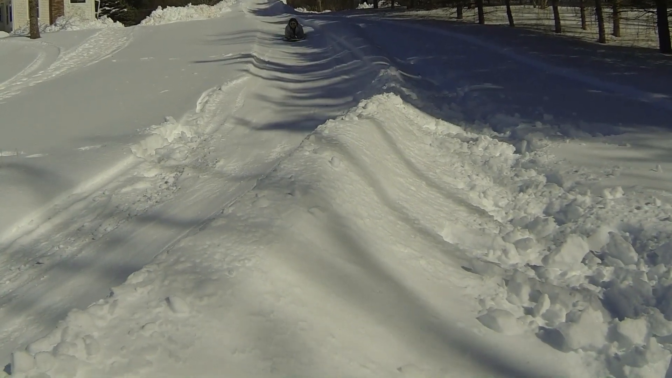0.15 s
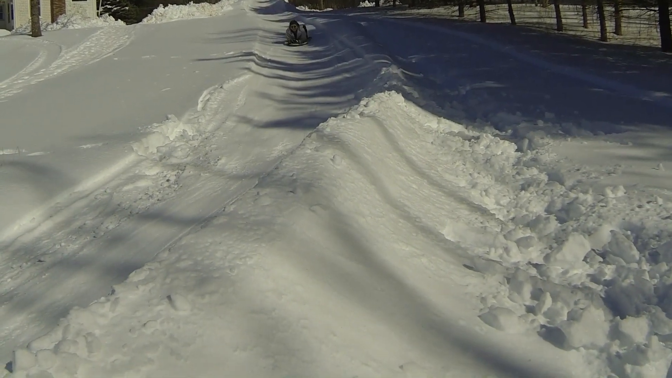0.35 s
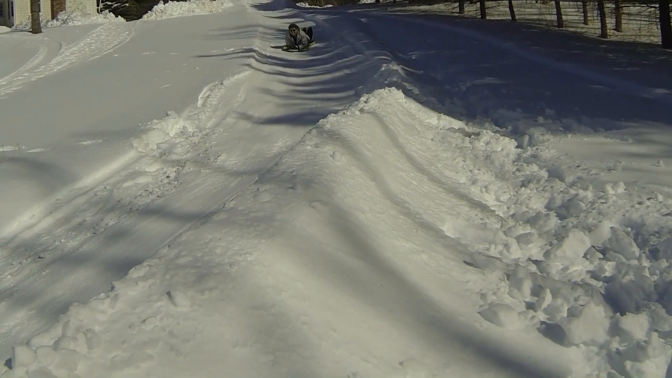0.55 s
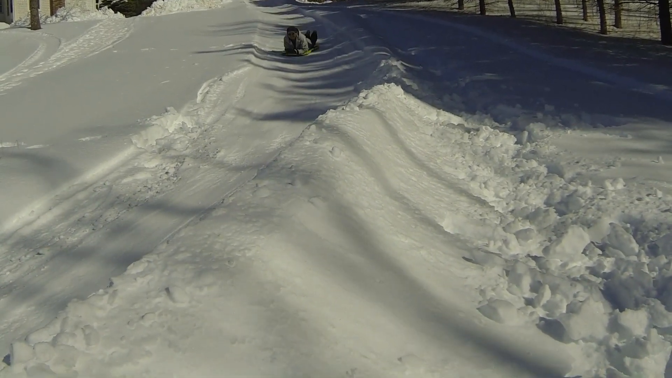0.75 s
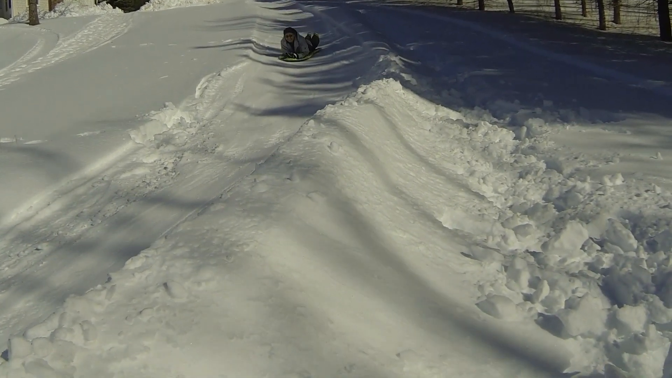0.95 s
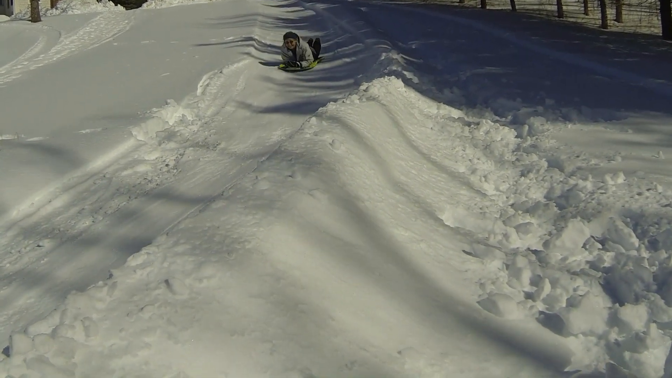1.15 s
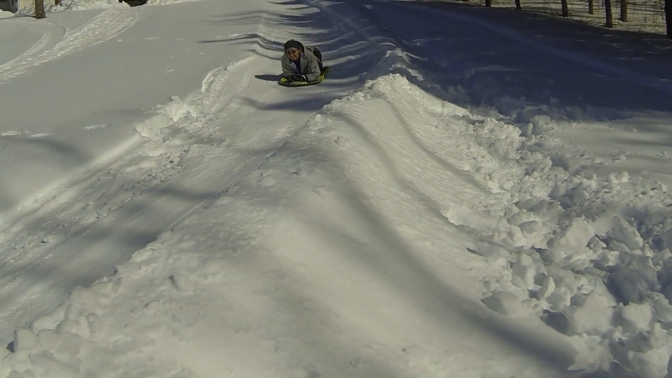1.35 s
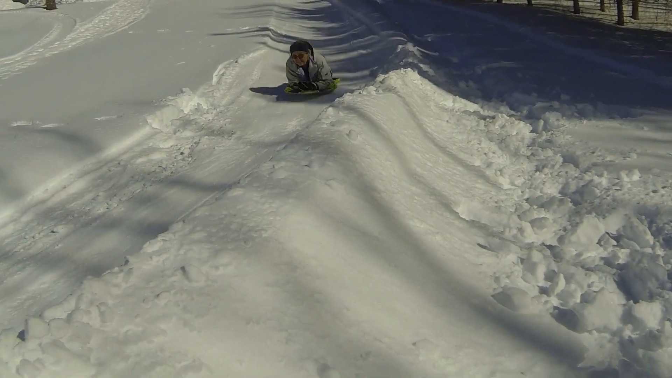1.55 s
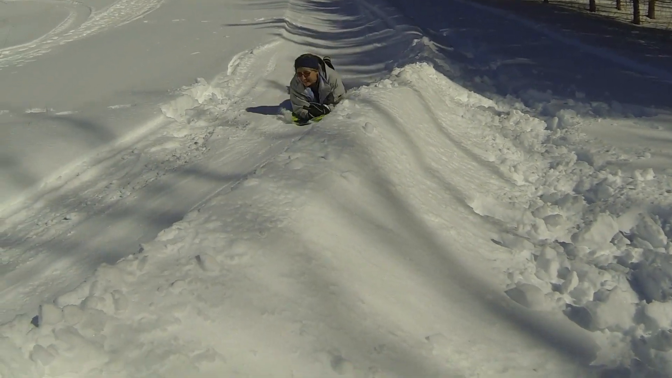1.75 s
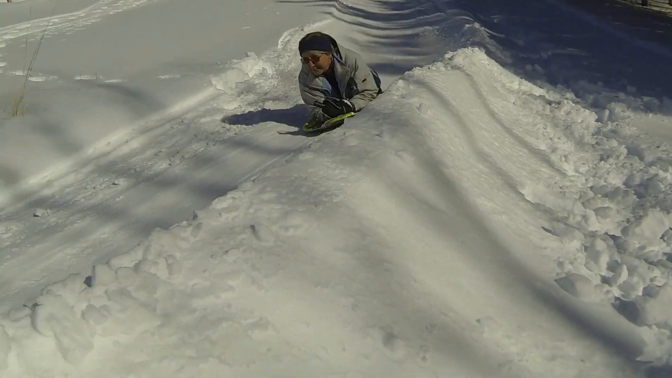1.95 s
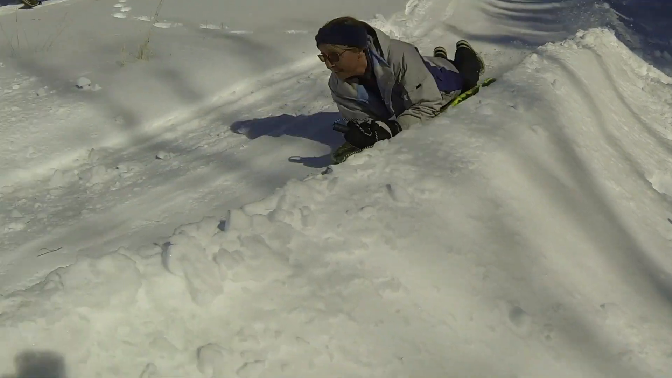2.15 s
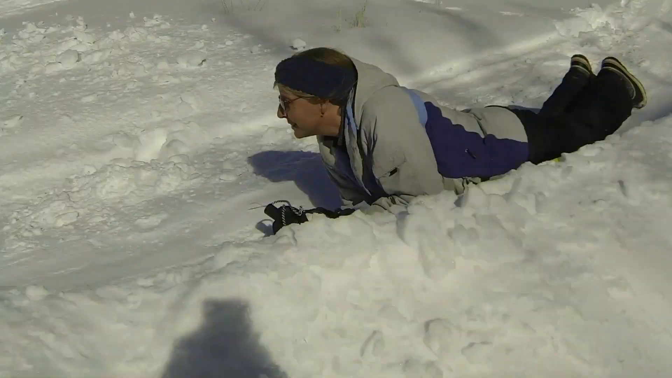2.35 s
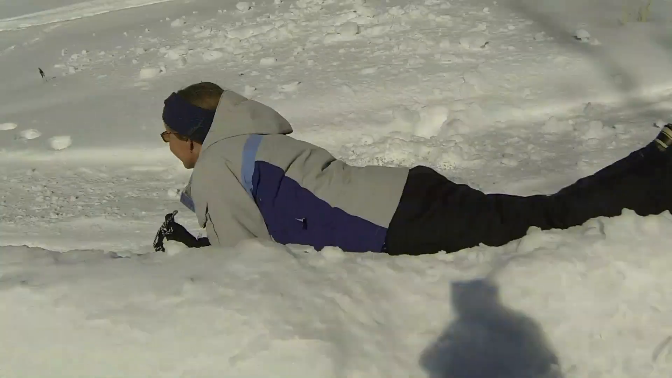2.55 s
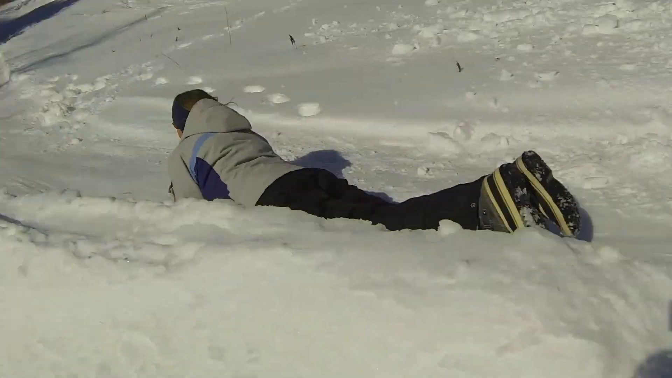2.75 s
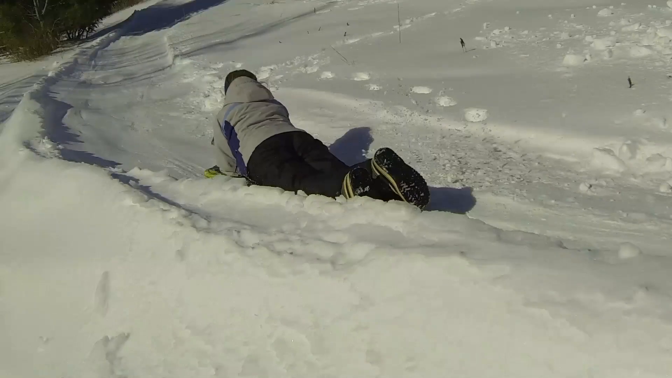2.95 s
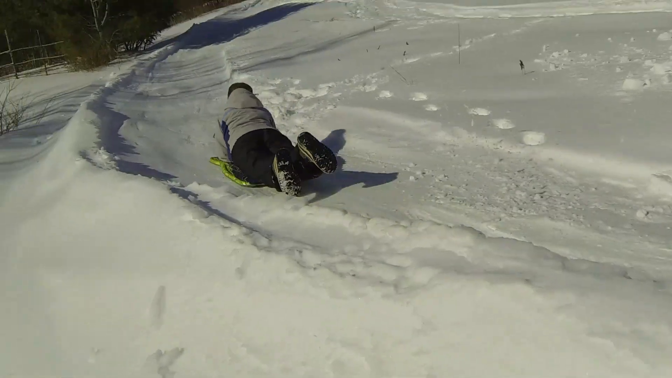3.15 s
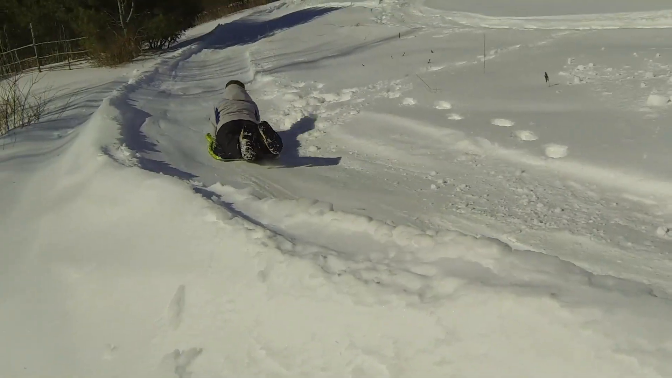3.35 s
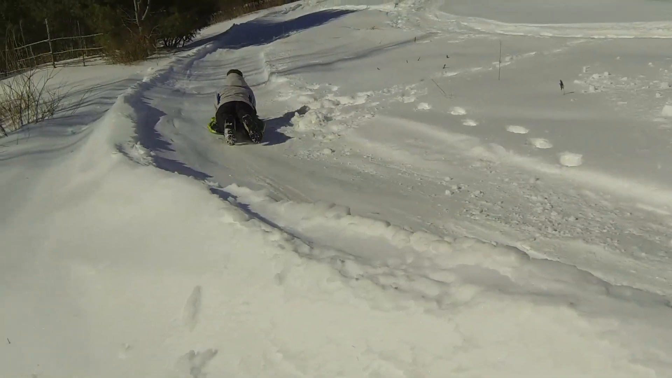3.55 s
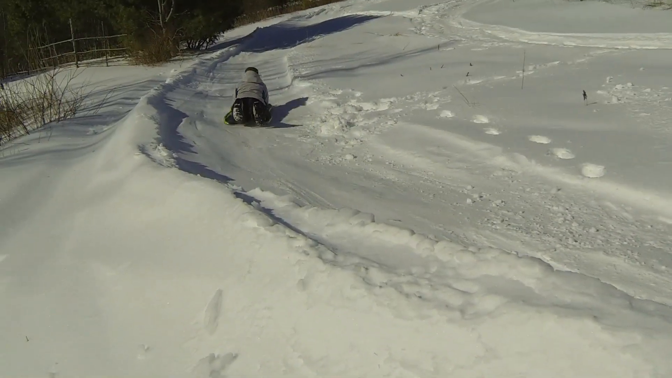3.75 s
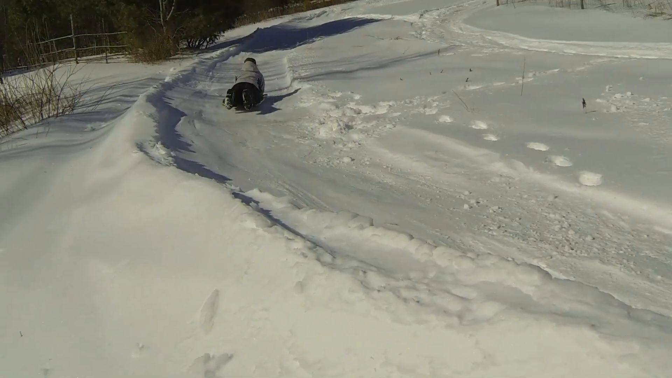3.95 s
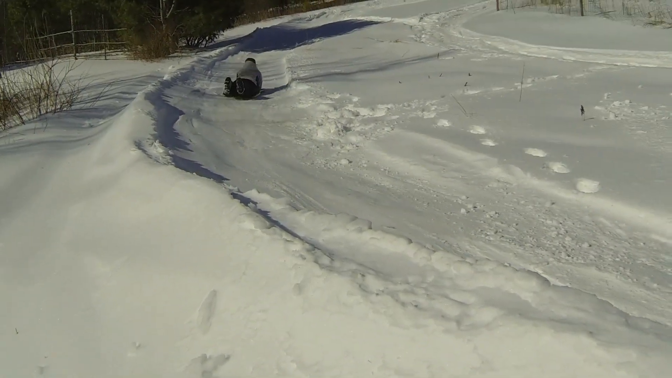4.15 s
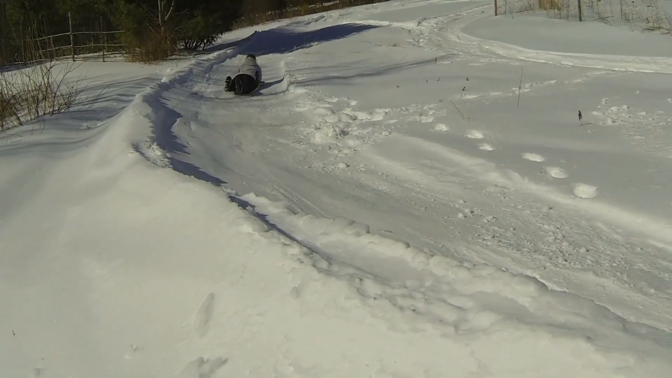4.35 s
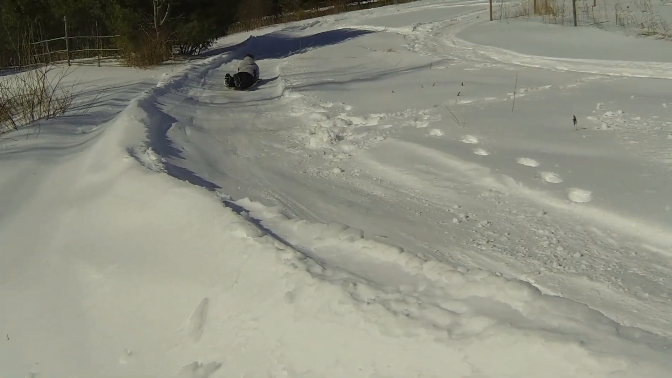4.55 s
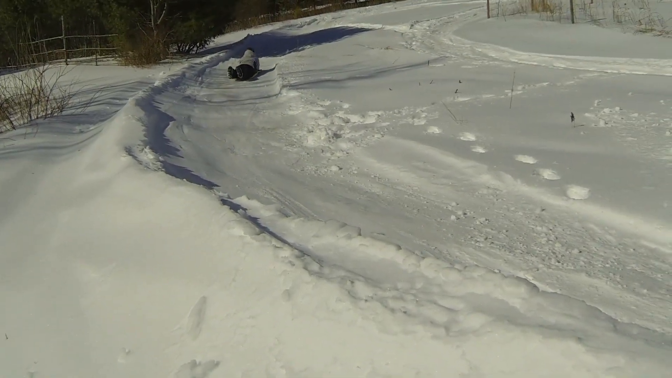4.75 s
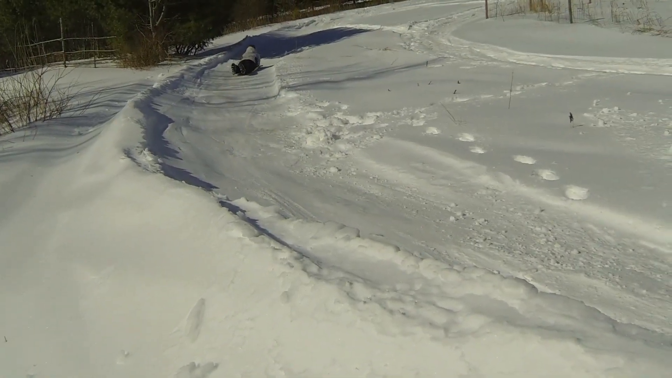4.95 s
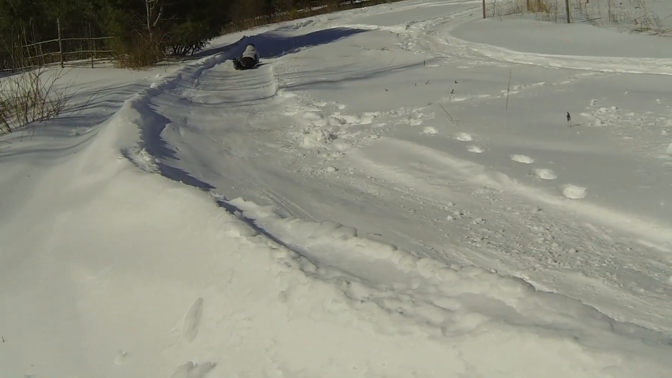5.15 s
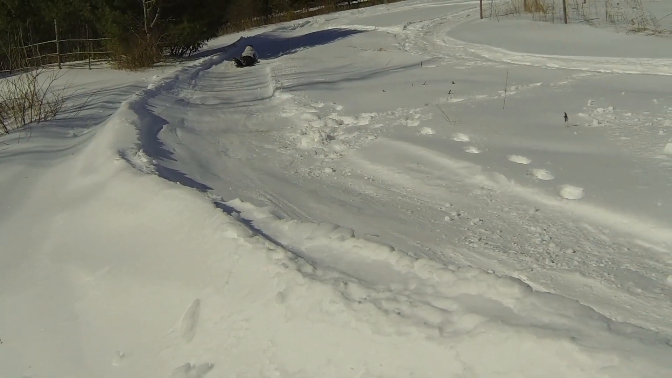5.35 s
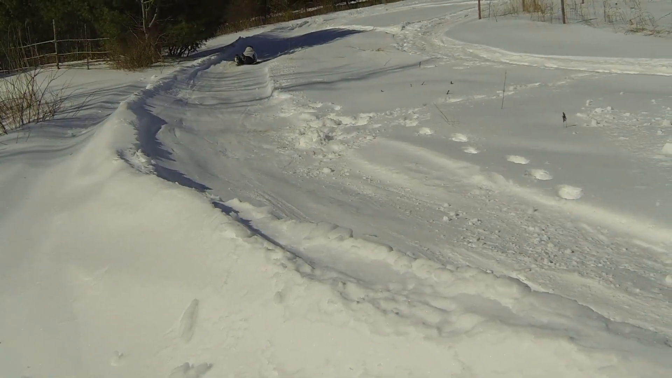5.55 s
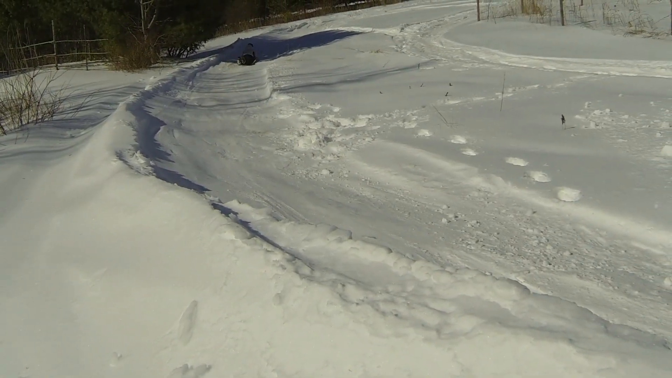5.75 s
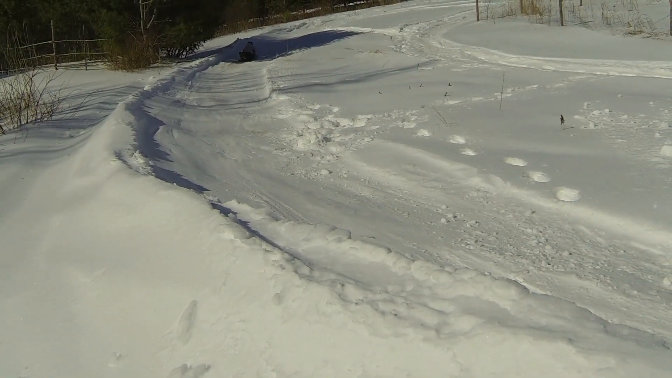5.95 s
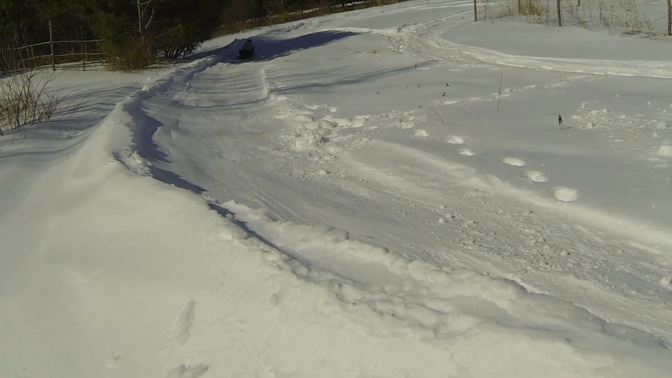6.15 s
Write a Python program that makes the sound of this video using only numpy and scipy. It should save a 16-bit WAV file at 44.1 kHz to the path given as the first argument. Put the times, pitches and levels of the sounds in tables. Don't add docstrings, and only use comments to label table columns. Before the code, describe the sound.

A plastic sled hisses and rumbles down packed snow, thumps and crackles past close by, then slides away as wind buffets the microphone.

```python
import sys
import numpy as np
from scipy import signal
from scipy.io import wavfile

SR = 44100
rng = np.random.default_rng(int(sys.argv[2]) if len(sys.argv) > 2 else 0)


def decibels_to_gain(level_db):
    exponent = np.asarray(level_db, float) / 20
    return 10 ** exponent


def to_wav(sig):
    pcm = np.clip(np.atleast_2d(sig), -1, 1) * 32767
    pcm = np.round(pcm).astype(np.int16)
    wavfile.write(sys.argv[1], SR, pcm.T)


N = 274037

# f/Hz, level/dB per Hz
STILL_AIR_COLOUR = [(15, -40), (25, 9.5), (59, 5), (131, -29), (637, -7.5), (1960, -24), (3010, -22.5),
                    (4750, -39), (8100, -42.5), (12400, -79.5), (15000, -70)]
WIND_COLOUR = [(12, -52), (20, -3), (49, -0.5), (160, -9.5), (210, -18.5), (350, -120)]
HULL_COLOUR = [(82, -29), (140, -10.5), (237, 1), (430, -4), (560, -23), (950, -120)]
DECK_COLOUR = [(250, -51), (420, -3), (528, -1), (578, 2), (1000, -14), (1300, -72), (2200, -120)]
SCRAPE_COLOUR = [(530, -5.5), (900, 4), (1280, -3.5), (1600, -4), (2200, -17), (2860, -29), (4840, -120)]
SPRAY_COLOUR = [(1500, -9.5), (2100, -6), (3000, 0), (4000, -4), (4800, -10), (6000, -40)]
POWDER_COLOUR = [(3600, -82), (4800, 4), (6800, -3), (9000, -7), (11100, -10.5), (13000, -12), (16000, -39)]
# t/s, level/dB
GUSTS = [(0.0, -55), (0.45, -43), (0.72, -40.5), (1.1, -46), (1.4, -36), (1.9, -38.5), (2.4, -48.5),
         (2.85, -38.5), (3.45, -44.5), (3.95, -40.5), (4.2, -46), (4.45, -41.5), (4.65, -47), (5.4, -49),
         (5.7, -53), (6.1, -45), (6.21, -49)]
# middle t/s, length/s, lift/dB
EDDIES = [(.15, 0.05, 9), (.79, 0.054, 14), (.93, 0.13, 8.5), (2.0, .08, 6), (2.26, 0.24, 8),
          (2.51, 0.06, 9.5), (2.62, 0.071, 15), (2.78, .08, 5), (3.58, 0.11, 8.5), (3.69, 0.05, 7),
          (4.05, 0.067, 2), (4.36, .1, 2), (4.53, 0.071, 4), (5.57, 0.058, 7.5), (3.43, .08, 0),
          (4.28, 0.061, 2.5), (4.78, .08, 2.5), (5.2, 0.1, -3.5)]
# t/s, hull weight as rumble level/dB, edge pressure as spray level/dB
SLIDE = [(0.0, -51, -62.5), (0.35, -52.5, -62.5), (0.8, -48, -56.5), (1.1, -48.5, -57.5),
         (1.35, -45, -54.5), (1.55, -48.5, -57.5), (1.72, -42, -67), (1.9, -51, -60), (2.18, -41, -58.5),
         (2.3, -41.5, -53.5), (2.55, -40.5, -54), (2.9, -40, -56), (3.3, -46, -57), (3.9, -45.5, -58),
         (4.4, -48, -58.5), (5.0, -51, -63), (5.4, -56.5, -68.5), (6.21, -52.5, -74)]
# middle t/s, length/s, rumble lift/dB, deck lift/dB
RIDGES = [(.27, 0.087, 4.5, 3.5), (.47, .08, -1, 3.5), (.67, .12, 0.5, -6), (.95, 0.28, 1, 3),
          (1.32, 0.22, 3.5, 1), (1.53, 0.13, 8, 0), (1.75, 0.033, 1, 6.5), (1.82, 0.036, 12.5, 11),
          (1.96, 0.17, 16.5, 11.5), (2.09, 0.051, 3.5, 1), (2.26, 0.096, 5, 4), (2.42, 0.15, 5.5, 3.5),
          (2.51, .06, 5.5, 1.5), (2.63, 0.11, 9.5, 8), (2.78, 0.097, 6, 4.5), (3.15, 0.092, 2, -2.5),
          (3.31, 0.05, 2.5, 6), (3.45, 0.076, 9.5, 6.5), (3.58, 0.17, 5.5, 4), (3.8, 0.21, 1.5, 2.5),
          (3.92, 0.067, 2, 5.5), (4.1, 0.053, 5, -1), (4.26, 0.072, 4.5, -4), (4.45, .1, 4.5, 6.5),
          (4.72, 0.15, 2.5, 1), (4.85, .08, 3.7, 3), (5.0, 0.12, -3, 4), (5.5, .2, 4.5, 3),
          (5.9, 0.24, 2, .3)]
# start t/s, length/s, lift/dB, extra powder/dB, extra scrape/dB
BITES = [(0.078, 0.034, -4, 0, -4), (0.196, 0.15, -3.5, 0.5, 9), (.5, 0.35, .3, 2.5, 0.5),
         (0.976, 0.045, 1.5, .3, -12), (1.28, 0.24, .3, 1.5, 2.7), (1.736, 0.12, 14, -1, -3.5),
         (1.8, 0.043, 2.5, 3, 5), (1.886, .02, 9, -5, 3), (1.932, 0.022, 8.5, -2, 11),
         (1.998, 0.032, 7, -.3, 5), (2.218, 0.03, 4, 2.5, 5), (2.298, 0.17, 2, .3, 4.5),
         (2.456, 0.052, 7.5, -3, -1.5), (2.575, .13, 7, 0.1, -2), (2.755, 0.09, 8, -2, -5),
         (3.032, 0.09, 5, -0.5, -2.5), (3.14, 0.035, 4, 1, -4), (3.46, 0.037, 4, 0, 1.5),
         (3.564, 0.048, 4, 1.5, 4), (3.697, .06, 2.5, 1.5, -4), (3.785, 0.11, 4, 1.5, -1.5),
         (3.892, .05, 4, 4.5, 4.5), (5.0, .04, -10, -2, 8), (5.905, 0.22, 5.5, -1.5, 0)]
# f/Hz, width/Hz, lift/dB
HOUSING = [
    (2955, 790, 5),
    (5280, 1540, 5.5),
]
# place/frame (0-1), level/dB
BUZZ = [
    (.28, -73),
    (.74, -75),
    (.81, -74),
    (.89, -72),
]
# t/s, peak level/dB (played 15 dB lower), f/Hz, ringing/cycles
SNAPS = [(0.2884, -38, 2920, 5.9), (1.741, -31, 3630, 5.1), (1.7973, -37, 3130, 5.1),
         (1.941, -23, 2800, 3.1), (2.0168, -30, 3140, 5.5), (2.09, -34, 2880, 5.5),
         (2.4833, -23, 3070, 8.5), (2.578, -22, 1690, 3.9), (2.626, -13.5, 2940, 2.1),
         (2.766, -32, 1480, 7.1), (2.8814, -56, 1720, 5.5), (2.9293, -19, 1550, 5.5),
         (2.9654, -47, 1460, 5.5), (3.415, -24, 1280, 3.5), (3.4674, -20, 1590, 4.3),
         (3.5676, -30, 1200, 4.8), (3.713, -39, 1190, 5.5), (3.8234, -33, 1220, 6), (3.982, -25, 1180, 7.3),
         (4.0764, -45, 1570, 5.5), (4.309, -29, 3580, 8), (4.99, -29, 1220, 4.1)]
# peak t/s, peak level/dB, f/Hz, ringing/cycles
BUMPS = [(.939, -30.5, 217, 1.4), (1.742, -19, 302, 0.94), (1.824, -29, 304, 0.82), (2.010, -30, 316, 1.8),
         (2.241, -29, 303, 2.1), (2.413, -20, 275, 3.4), (2.512, -19.5, 294, 0.96), (2.629, -32, 218, 1.2),
         (2.706, -23.5, 220, 1.4), (2.769, -26, 200, 1.4), (2.780, -21, 200, 2.6), (2.941, -36, 270, 0.95),
         (3.079, -40, 268, 1.2), (3.317, -25, 234, 1.8), (3.437, -36, 220, 1.5), (3.575, -23.5, 348, 0.67),
         (4.017, -27, 300, 1.8),
         (2.641, -14.5, 540, 2.2),
]
BUFFETS = [
    (0.799, -26, 88, 1.25),
    (2.279, -30, 63, 1.4),
    (3.699, -44.5, 75, 1.46),
    (4.042, -29.5, 99, 1.2),
    (4.105, -27.5, 88.5, 0.71),
    (4.537, -35, 65, 1.25),
]

TURN_S, TURN_TAKES_S = 2.47, 0.15


def rms_one(x):
    return x / np.sqrt(np.mean(x ** 2) + 1e-20)


def in_time(rows):
    s, *columns = np.transpose(rows)
    return [np.interp(np.arange(N) / SR, s, c) for c in columns]


def swells(events):
    t = np.arange(N) / SR
    return sum(np.outer(lifts_db, np.exp(-(2 * (t - s) / length_s) ** 2))
               for s, length_s, *lifts_db in events)


def change(s, takes_s):
    return 0.5 + 0.5 * np.tanh((np.arange(N) / SR - s) / max(takes_s, 1e-3))


def drift(rate_hz):
    r = np.exp(-80 * np.pi * rate_hz / SR)
    noise = rng.standard_normal(N // 40 + 2002)
    slow = signal.lfilter([1], [1, -2 * r, r * r], noise)[2000:]
    return np.interp(np.arange(N) / 40, np.arange(len(slow)), rms_one(slow))


def ring(clicks, hz, t60_s):
    r = decibels_to_gain(-60 / (t60_s * SR))
    w = 2 * np.pi * hz / SR
    return signal.lfilter([0, np.sin(w)], [1, -2 * r * np.cos(w), r * r], clicks + 1e-18)


def double_ring(length, hz, t60_s):
    click = np.zeros(length)
    click[0] = 1
    return ring(ring(click, hz, t60_s), hz, t60_s)


def grains(per_s, spread_db):
    sizes_db = spread_db * np.minimum(rng.exponential(1, (2, N)), 5)
    sizes = decibels_to_gain(sizes_db) * rng.choice([-1, 1], (2, N))
    return rms_one(sizes * (rng.random((2, N)) < per_s / SR))


def coloured(trains, spectrum, shared_db, own_db, rate_hz):
    hz_points, db_points = np.transpose(spectrum)
    octaves = np.log2(min(hz_points[-1], 19000) / hz_points[0])
    edges_hz = hz_points[0] * 2 ** np.arange(0, octaves, 0.25)
    together_db = shared_db * drift(rate_hz)
    out = 0
    for k, (low, high) in enumerate(zip(edges_hz, edges_hz[1:])):
        band_pass = signal.butter(2, [low, high], "band", fs=SR, output="sos")
        band = signal.sosfilt(band_pass, trains[k % 2])
        level_db = np.interp(np.log(low * high) / 2, np.log(hz_points), db_points)
        out = out + band * decibels_to_gain(level_db + together_db + own_db * drift(9.0))
    return rms_one(out)


def still_air():
    noise = rng.standard_normal((2, N))
    return decibels_to_gain(-52) * coloured(noise, STILL_AIR_COLOUR, shared_db=-0.8, own_db=1.55, rate_hz=3.4)


def wind():
    gust_db, = in_time(GUSTS)
    eddy_db, = swells(EDDIES)
    lumps = grains(600, 1.54)
    return decibels_to_gain(gust_db + eddy_db) * coloured(lumps, WIND_COLOUR, shared_db=0.9, own_db=1.5, rate_hz=14)


def hull():
    bend_s, bend_takes_s = 5.12, 0.05
    front_db, rear_db, far_db = -3.5, -1.66, -7
    weight_db, _ = in_time(SLIDE)
    ridge_db, deck_db = swells(RIDGES)
    deck_db = deck_db + front_db + (rear_db - front_db) * change(TURN_S, TURN_TAKES_S)
    deck_db = deck_db + (far_db - rear_db) * change(bend_s, bend_takes_s)
    lumps = grains(1500, 2.3)
    rumble = decibels_to_gain(ridge_db) * coloured(lumps, HULL_COLOUR, shared_db=-1.2, own_db=-0.46, rate_hz=75)
    deck = decibels_to_gain(deck_db) * coloured(lumps, DECK_COLOUR, shared_db=0.65, own_db=2.0, rate_hz=16.0)
    radiation = signal.butter(6, 903, fs=SR, output="sos")
    radiated = signal.sosfilt(radiation, rumble + deck)
    return decibels_to_gain(weight_db) * decibels_to_gain(0.56 * drift(10.0)) * radiated


def edge_levels():
    attack_s, release_s = 0.0072, 0.022
    scrape_front_db, scrape_rear_db, scrape_gain_db_per_s = -4.5, 5.5, 1.8
    bank_s, bank_takes_s = 3.64, 0.012
    powder_seen_db, powder_hidden_db, powder_gain_db_per_s = -5.5, -13, 4
    t = np.arange(N) / SR
    _, pressure_db = in_time(SLIDE)
    lift_db, powder_db, scrape_db = sum(
        np.outer(lifts_db, change(s, attack_s) * (1 - change(s + length_s, release_s)))
        for s, length_s, *lifts_db in BITES)
    rear_db = scrape_rear_db + scrape_gain_db_per_s * (t - TURN_S)
    turned = change(TURN_S, TURN_TAKES_S)
    scrape_db = scrape_db + scrape_front_db + (rear_db - scrape_front_db) * turned
    hidden_db = powder_hidden_db + powder_gain_db_per_s * (t - bank_s)
    hidden = change(bank_s, bank_takes_s)
    powder_db = powder_db + powder_seen_db + (hidden_db - powder_seen_db) * hidden
    spray_db = pressure_db + lift_db
    return spray_db, scrape_db, spray_db + powder_db


def spray():
    spray_db, scrape_db, powder_db = edge_levels()
    crystals = grains(12000, 2.97)
    scrape = coloured(crystals, SCRAPE_COLOUR, shared_db=0.0, own_db=-0.2, rate_hz=37)
    hiss = coloured(crystals, SPRAY_COLOUR, shared_db=0.4, own_db=1.0, rate_hz=83)
    powder = coloured(crystals, POWDER_COLOUR, shared_db=0.5, own_db=1.5, rate_hz=12)
    chatter = decibels_to_gain(0.66 * drift(41))
    coarse = decibels_to_gain(spray_db - 3.0) * (decibels_to_gain(scrape_db) * scrape + hiss)
    return chatter * (coarse + decibels_to_gain(powder_db - 2.5) * powder)


def housing(x):
    for hz, width_hz, lift_db in HOUSING:
        r = np.exp(-np.pi * width_hz / SR)
        poles = [1, -2 * r * np.cos(2 * np.pi * hz / SR), r * r]
        cavity = signal.lfilter([(1 - r * r) / 2, 0, (r * r - 1) / 2], poles, x)
        x = x + (decibels_to_gain(lift_db) - 1) * cavity
    return signal.sosfilt(signal.butter(4, 12000, fs=SR, output="sos"), x)


def self_noise():
    low_pass = signal.butter(2, 8500, fs=SR, output="sos")
    return decibels_to_gain(-72.5) * rms_one(signal.sosfilt(low_pass, rng.standard_normal(N)))


def buzz():
    frame_hz = 30000 / 1001
    frame = np.arange(N) * frame_hz / SR
    strength = decibels_to_gain(0.88 * rng.standard_normal((int(frame[-1]) + 1, len(BUZZ))))
    gate = 0
    for k, (place, db) in enumerate(BUZZ):
        burst = np.exp(-((frame % 1 - place) / 0.05) ** 2)
        gate = gate + decibels_to_gain(db) * strength[frame.astype(int), k] * burst
    noise = ring(gate * rng.standard_normal(N), hz=8050, t60_s=0.0014)
    return rms_one(ring(noise, hz=8100, t60_s=0.0014)) * np.sqrt(np.mean(gate ** 2))


def snaps():
    out = np.zeros(N)
    for s, peak_db, hz, cycles in SNAPS:
        at = round(s * SR)
        rung = double_ring(SR // 40, hz, max(cycles, 1) / hz)
        out[at:at + len(rung)] += decibels_to_gain(peak_db - 15.0) * rung / np.abs(rung).max()
    return out


def thumps(events):
    out = np.zeros(N)
    for s, peak_db, hz, cycles in events:
        t60_s = max(cycles, 0.5) * 2 / hz
        rung = signal.lfilter([1, -1], [1, -0.99], double_ring(SR // 8, hz, t60_s))
        at = round((s - t60_s / np.log(1000)) * SR)
        out[at:at + len(rung)] -= decibels_to_gain(peak_db) * rung / np.abs(rung).max()
    return out


def scene():
    pushes = thumps([*BUMPS, *BUFFETS])
    return (still_air() + wind() + hull() + spray() + snaps() + pushes)[None]


def top_cut(x):
    return signal.sosfilt(signal.butter(12, 15200, fs=SR, output="sos"), x)


def record(dry):
    mix = housing(dry) + self_noise() + buzz()
    return top_cut(mix)


dry = scene()
out = record(dry)
to_wav(out)
```